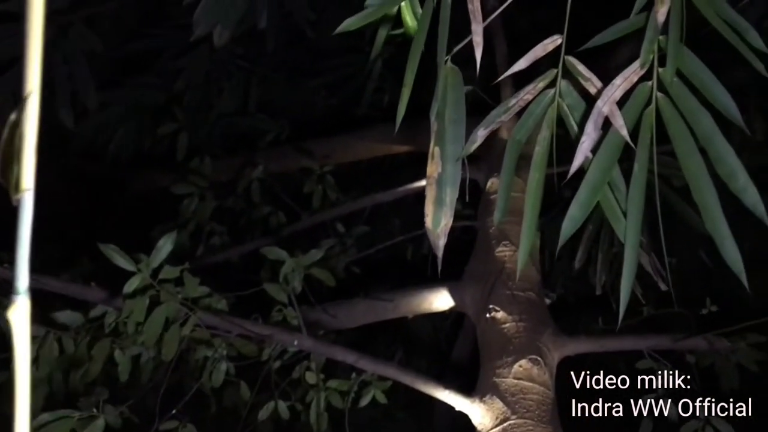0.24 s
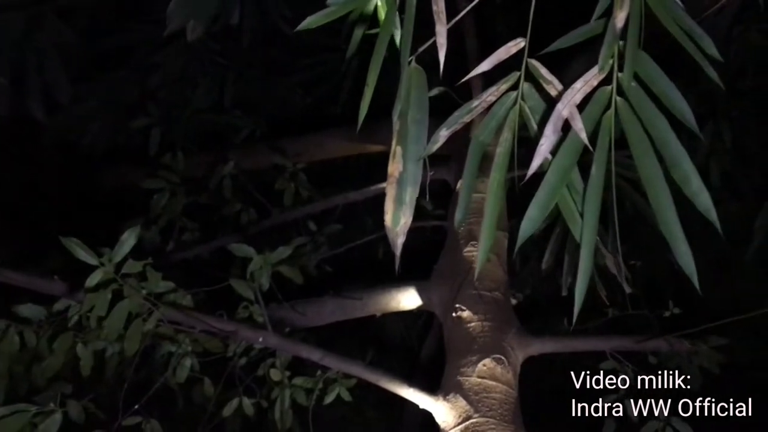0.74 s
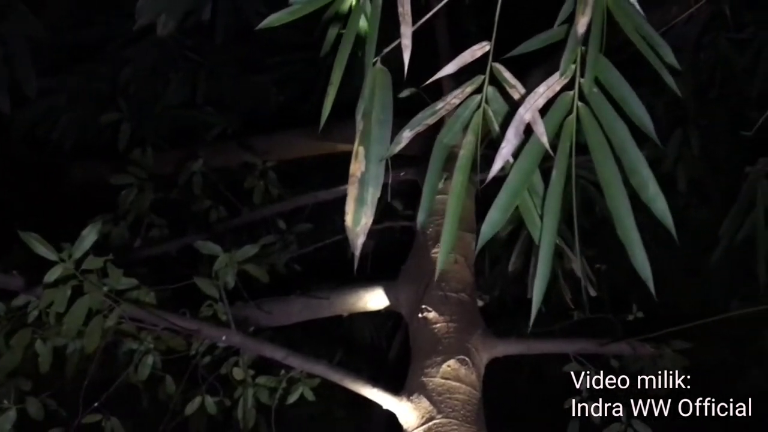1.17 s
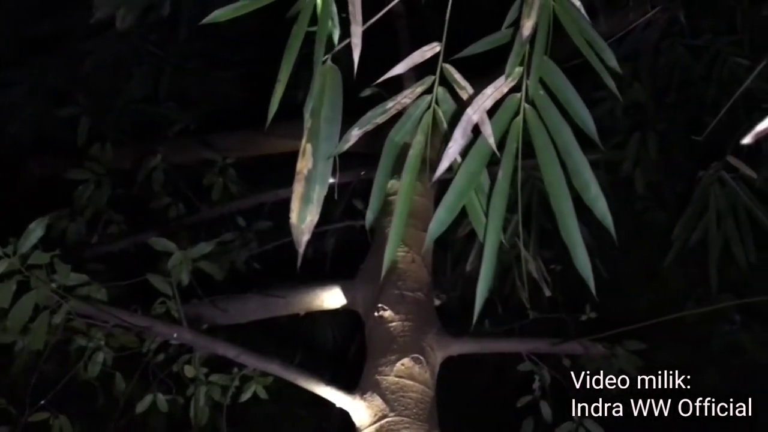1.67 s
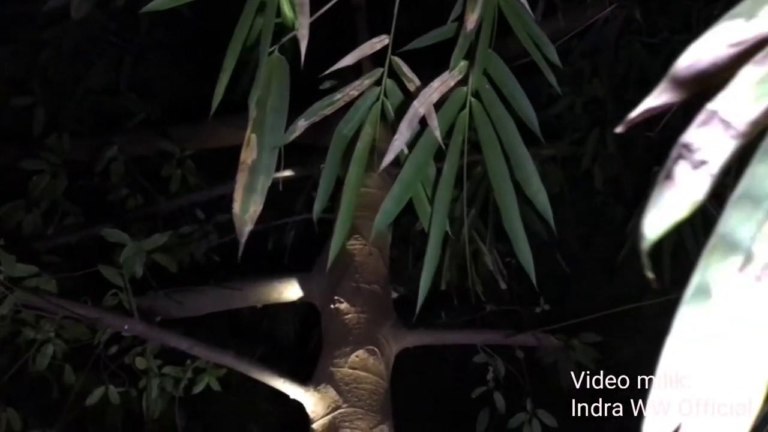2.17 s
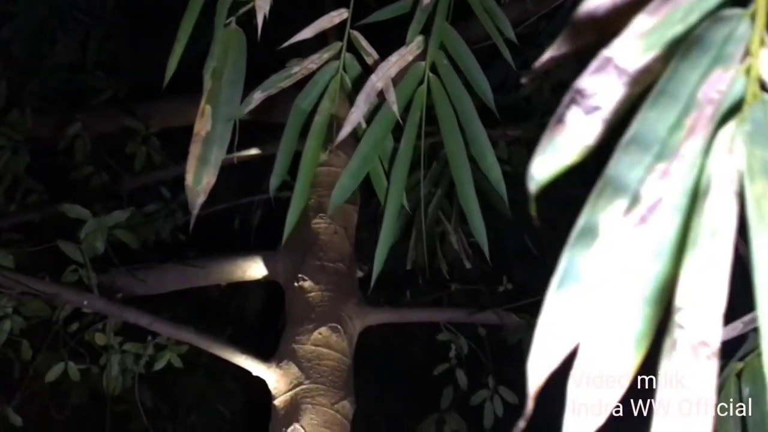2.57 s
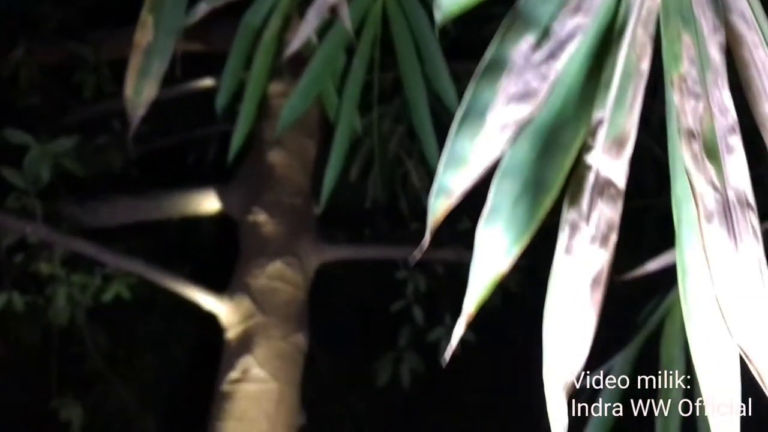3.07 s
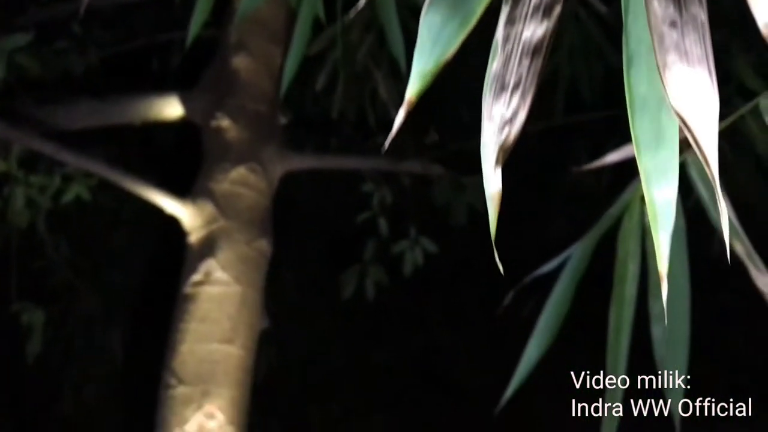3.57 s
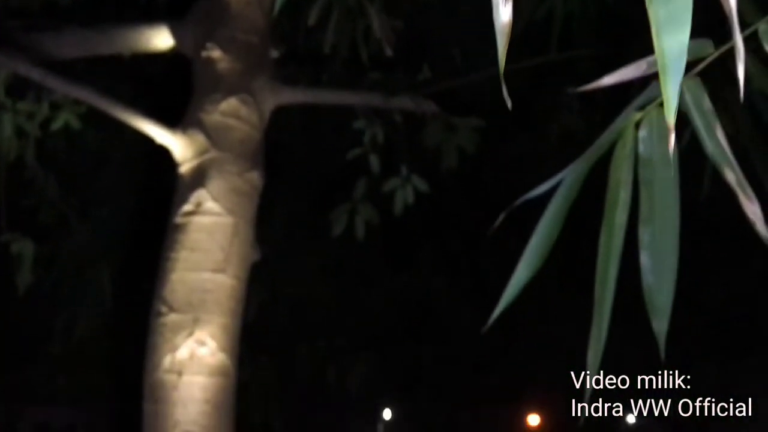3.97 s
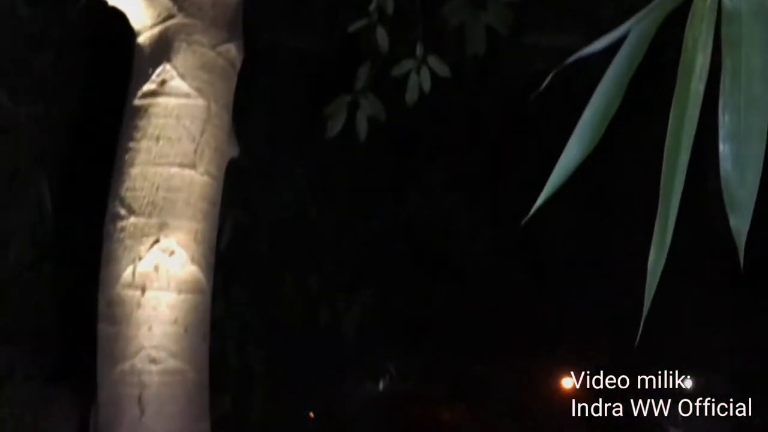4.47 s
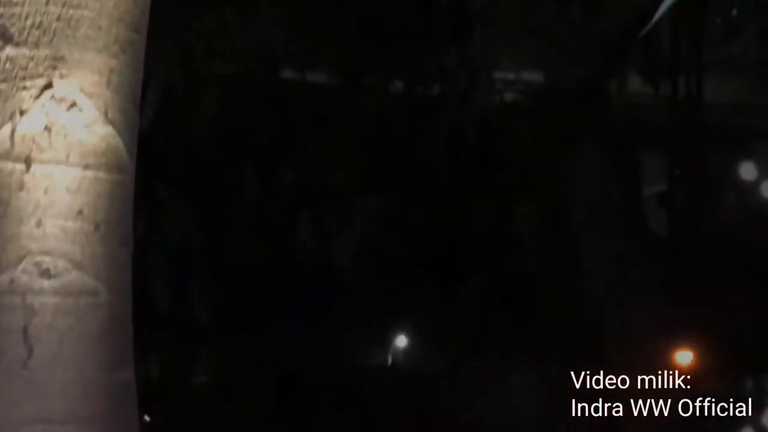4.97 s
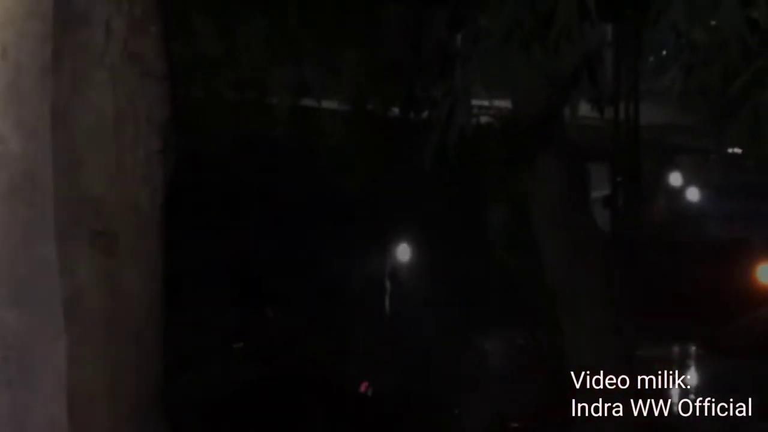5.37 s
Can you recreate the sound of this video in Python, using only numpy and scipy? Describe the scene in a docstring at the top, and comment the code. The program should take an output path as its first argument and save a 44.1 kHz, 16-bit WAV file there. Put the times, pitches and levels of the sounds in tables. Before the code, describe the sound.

Close frog croaks in spaced rasps over quiet night air and high cricket chirps, a far frog trills, and a strong rattling trill ends it.

```python
"""Among leaves at night, tree frogs call around a microphone.
A near frog gives four rasping croaks, pulses and air ringing its vocal sac, then trills four-pulse notes
with a shrill buzz on top; a far frog trills once, heard through its resonances. A cricket chirps in twos
and threes of humped tones. Filtered noise makes the night air, the hum of far insects, a low drone that
sets in, and wind rumbling on the microphone. A double tick strikes its case. Foliage scatters the calls."""
import sys
import numpy as np
from scipy import signal
from scipy.io import wavfile
from scipy.ndimage import uniform_filter1d

SR = 44100
rng = np.random.default_rng(int(sys.argv[2]) if len(sys.argv) > 2 else 0)


def dump(signal):
    """Clip the signal to [-1, 1] and save it as 16-bit WAV at the path in sys.argv[1]."""
    limited = np.clip(np.atleast_2d(signal).T, -1, 1)
    pcm = np.round(limited * 32767).astype(np.int16)
    wavfile.write(sys.argv[1], SR, pcm)


N = 248062


def amp(db):
    """Logarithmic level: decibels to amplitude gain."""
    return 10 ** (np.asarray(db) / 20)


def rms_one(x):
    """Normalisation: scales a signal to unit rms."""
    return x / np.sqrt(np.mean(x ** 2) + 1e-30)


def lowpass(x, cutoff_hz, order):
    """Butterworth low-pass: a maximally flat pass band."""
    return signal.sosfilt(signal.butter(order, cutoff_hz, fs=SR, output="sos"), x)


def band(x, low_hz, high_hz, order=2):
    """Butterworth band-pass: a maximally flat pass band."""
    return signal.sosfilt(signal.butter(order, [low_hz, high_hz], "band", fs=SR, output="sos"), x)


def pole_radius(width_hz):
    """Damping: the pole radius that gives four cascaded resonances this joint width."""
    return np.exp(-2.3 * np.pi * width_hz / SR)


def resonate(x, hz, width_hz):
    """Cascaded resonance: four equal stages give steep flanks, a soft attack and a peak gain near 1."""
    r = pole_radius(width_hz)
    zeros = [(1 - r * r) / 2, 0, (r * r - 1) / 2]
    poles = [1, -2 * r * np.cos(2 * np.pi * hz / SR), r * r]
    return signal.sosfilt([zeros + poles] * 4, x + 1e-18)


def gliding_resonance(x, hz, width_hz):
    """Heterodyning: shift a moving centre to zero, low-pass four times, shift back."""
    turn = np.exp(2j * np.pi * np.cumsum(hz) / SR)
    r = pole_radius(width_hz)
    return 2 * np.real(turn * signal.sosfilt([[1 - r, 0, 0, 1, -r, 0]] * 4, x / turn))


def resonate_all(x, modes):
    """Modal superposition: resonances side by side with alternating signs."""
    total = 0
    for k, (hz, width_hz, db) in enumerate(modes):
        total = total + (-1) ** k * amp(db) * resonate(x, hz, width_hz)
    return total


def add(out, s, burst):
    """Linear superposition: mixes in a burst centred on time s."""
    start = round(s * SR) - len(burst) // 2
    out[start:start + len(burst)] += burst[:N - start]


def tone_burst(hz, ms, sharpness):
    """Amplitude modulation: a sine under a hump that narrows as sharpness rises."""
    n = np.arange(round(ms * SR / 1000))
    hump = np.sin(np.pi * n / len(n)) ** sharpness
    return hump * np.sin(2 * np.pi * hz * n / SR)


# Spectrum of the night air [f/Hz, relative density level/dB]
NIGHT_SPECTRUM = [(56, -30), (95, -8.5), (113, -16.5), (223, -26), (259, -27), (582, -36), (1200, -40.5),
                  (1720, -52.5), (2370, -44), (3340, -53), (9800, -52.5), (11500, -58), (15500, -58)]
# Resonances of the far insects' hum [f/Hz, width/Hz, relative level/dB]
INSECT_HUM = [(2300, 50, -7.5), (2428, 43, -2), (2490, 25, -8)]
NIGHT_DB, HUM_DB = -72.5, -83   # rms levels


def night_air():
    """Band synthesis: half-octave noise bands follow a spectrum; resonated noise hums as far insects."""
    edges_hz = 90 * 2 ** np.arange(0, 7.6, .5)
    hz, db = np.transpose(NIGHT_SPECTRUM)
    white = rng.standard_normal((2, 2, N))   # neighbouring bands take independent noise
    air = 0
    for k, (low, high) in enumerate(zip(edges_hz, edges_hz[1:])):
        band_db = np.interp(np.log(low * high) / 2, np.log(hz), db)
        air = air + amp(band_db) * band(white[k % 2], low, high)
    mid, side = rms_one(air)
    hum = amp(HUM_DB) * rms_one(resonate_all(rng.standard_normal(N), INSECT_HUM))
    spread = mid + amp(-15) * side * [[1], [-1]]
    return amp(NIGHT_DB) * spread + hum


# Strength of the wind gusts [t/s, buffeting level/dB]
GUSTS = [(0.0, -53), (0.16, -42.5), (0.22, -71.5), (0.33, -45.5), (0.59, -65), (0.62, -46.5), (1.64, -62),
         (1.81, -45.5), (2.05, -70.5), (2.27, -22.5), (2.32, -39), (2.38, -34), (2.52, -61), (2.58, -45),
         (3.03, -58.5), (3.29, -33), (3.5, -65.5), (3.63, -33.5), (3.79, -47.5), (4.54, -65.5), (4.68, -32),
         (4.76, -57), (5.09, -65), (5.13, -48.5), (5.57, -46.5), (5.62, -48)]
RUMBLE_HZ = 75
# rumble level at a buffeting of -50 dB; share of the buffeting's swing; rms of its own waver
RUMBLE_DB, RUMBLE_FOLLOWS, RUMBLE_WAVER_DB = -58.5, 0.6, 2.5


def wind():
    """Turbulent pressure noise: gusts on the microphone ports buffet slowly and rumble above that."""
    white = rng.standard_normal((4, N))
    gust_db = np.interp(np.arange(N) / SR, *np.transpose(GUSTS))
    waver = rms_one(lowpass(rng.standard_normal(N), 3.0, order=2))
    rumble_db = RUMBLE_DB + RUMBLE_FOLLOWS * (gust_db + 50) + RUMBLE_WAVER_DB * waver
    buffet = amp(gust_db) * rms_one(band(white[:2], 10.5, 33, order=3))
    rumble = rms_one(band(white[2:], 45, 80)) + .7 * rms_one(resonate(white[2:], RUMBLE_HZ, 16))
    mid, side = buffet + amp(rumble_db) * rms_one(rumble)
    gusts = mid + amp(-31.0) * side * [[1], [-1]]
    return lowpass(gusts, 88, order=8)


# Cricket chirps [start t/s, main stroke level/dB, first stroke softer by/dB, stroke gap/ms, strokes]
CHIRPS = [(0.138, -59.5, 19, 37, 2), (0.3704, -43.5, 6, 36, 3), (0.611, -42, 5, 31.4, 3),
          (0.849, -44, 2.1, 36.5, 3), (1.0897, -43, 4.5, 30, 2), (1.3293, -49.5, 2.5, 34, 2),
          (1.5703, -46.5, 9.5, 31.4, 2), (3.5557, -45, 7.5, 36, 2), (3.7604, -44.5, 2.5, 39.2, 3),
          (4.0115, -42, 4, 36.7, 3), (4.2493, -43, 2, 35.3, 3), (4.4867, -45, 3.8, 34, 2),
          (4.7277, -43, 9.8, 37.5, 3)]
CRICKET_HZ, STROKE_MS = 4865, 15
THIRD_STROKE_GAPS, THIRD_STROKE_DB = 2.28, -2.5   # the third stroke comes late and a little softer


def cricket():
    """Stridulation: each wing stroke is a nearly pure tone that swells and stops, with a faint scrape."""
    out = np.zeros(N)
    for s, db, softer_db, gap_ms, strokes in CHIRPS:
        pattern = [(0, -softer_db), (1, 0), (THIRD_STROKE_GAPS, THIRD_STROKE_DB)]
        for gaps, change_db in pattern[:round(strokes)]:
            pitch_hz = CRICKET_HZ * (1 + 0.0068 * rng.standard_normal())
            stroke = tone_burst(pitch_hz, STROKE_MS, sharpness=2.2)
            scrape = tone_burst(rng.uniform(4600, 5400), STROKE_MS, sharpness=40)
            centre_s = s + 0.0026 + gaps * gap_ms / 1000
            add(out, centre_s, amp(db + change_db) * (stroke + amp(-18.5) * scrape))
    return out


# Croak envelopes [start t/s, level after attack/dB, middle breakpoint t/s, middle breakpoint level/dB, release
# t/s, # release level/dB, fade/(dB/s), end t/s, spectral tilt at start/(dB/octave), tilt at end/(dB/octave)]
CROAK_ENVELOPES = [(0.172, -32.5, 0.264, -19.5, 0.28, -32.5, 420, 0.37, -14, 7.5),
                   (1.182, -31, 1.341, -30, 1.391, -32, 200, 1.52, -16.5, 19.5),
                   (2.288, -27.5, 2.404, -18, 2.441, -19.5, 290, 2.55, -10.5, 11.5),
                   (4.422, -35, 3.8, -37.5, 4.66, -30, 260, 4.7, -21.5, 18)]
# Vocal sac resonances, one list a croak [f/Hz, width/Hz, relative level/dB]
CROAK_SACS = [
    [(552.6, 47, -17), (1093, 87, -23), (1204, 120, -24), (1394, 350, -18.5), (1840, 220, -10.5),
     (2004, 60, 1), (2692, 150, -23), (3020, 80, -23.5), (3290, 80, -40.5), (3820, 70, -46.5)],
    [(672.6, 42, -15), (1402, 89, 0.5), (1971, 35, 0), (2046, 167, 0.5), (2618, 77, -3.5), (2815, 83, -2),
     (3220, 200, -21.5), (4100, 120, -34.5), (4640, 140, -46)],
    [(578.3, 58, -7), (1050, 350, -18), (1577, 270, -12), (1977, 118, -0.5), (2122, 180, 1),
     (2820, 293, -15.5), (3320, 66, -26), (3770, 94, -39), (4223, 190, -40.5), (5440, 60, -40.5),
     (5890, 69, -37), (7520, 86, -49)],
    [(621, 60, -16.5), (1228, 142, -4), (1545, 86, 0), (1775, 170, 1), (2030, 51, 15), (2278, 110, 8.5),
     (2593, 216, 1.5), (3080, 38, -15), (4000, 50, -45), (4450, 100, -42.5), (6000, 130, -49)],
]
# Croak pulsing [pulses/(1/s), unevenness (0-1), first upper edge f/Hz, edge rise/(octave/s),
# resonance glide/(octave/s, less above 2000 Hz), bass level at first/dB]
CROAK_PULSING = [(125, .3, 1150, 14, .01, -1), (165, .1, 1450, 14, -.45, -8), (120, .25, 1450, 10, .25, -6),
                 (200, .3, 1420, 9, .4, -45)]
CROAK_ATTACK_S, CROAK_RISE_DB = 0.038, 32
SAC_EDGE_HZ = 2800   # resonances above it darken and brighten no further


def croak(row, sac, per_s, uneven, edge_hz, opening, glide, bass_db):
    """Source and filter: uneven vocal pulses and rushing air ring each sac resonance differently."""
    begin, knee_db, middle_s, middle_db, release_s, release_db, fade, end, dark, bright = row
    start, stop = round(begin * SR), round(end * SR)
    t = np.arange(stop - start) / SR
    times = [begin, begin + CROAK_ATTACK_S, middle_s, release_s, end]
    end_db = release_db - fade * (end - release_s)
    level_db = np.interp(begin + t, times, [knee_db - CROAK_RISE_DB, knee_db, middle_db, release_db, end_db])

    gaps = SR / per_s * np.exp(uneven * rng.standard_normal(120))
    at = np.cumsum(gaps).astype(int)
    at = at[at < stop - start]
    tilt = dark + (bright - dark) * t / t[-1]   # the sac brightens as it fills
    voice = 0
    for hz, width_hz, db in sac:
        drive = (0.07 + .2 * (hz > SAC_EDGE_HZ)) * rng.standard_normal(stop - start)   # rushing air
        drive[at] += (1 + 0.37 * uneven * rng.standard_normal(120))[:len(at)]   # vocal pulses
        glide_octaves = min(1, 2000 / hz) * glide * (t - t.mean())
        ringing = rms_one(gliding_resonance(drive, hz * 2 ** glide_octaves, width_hz))
        # the slack sac radiates little above an edge that climbs as it fills
        tilt_hz = min(hz, SAC_EDGE_HZ)
        above_edge = np.log2(tilt_hz / edge_hz) - opening * t
        muffled_db = 50 * np.clip(above_edge, 0, .4 + .4 * np.exp(-t / .05))
        held_back_db = bass_db * np.exp(-t / .04) * (hz < .9 * edge_hz)
        mode_db = db + 10 * np.log10(width_hz) + tilt * np.log2(tilt_hz / 2000) - muffled_db
        voice = voice + ringing * amp(held_back_db) * amp(mode_db)

    running_rms = np.sqrt(uniform_filter1d(voice ** 2, size=1500) + 1e-12)
    pressure = amp(uniform_filter1d(level_db, size=450))   # lung pressure alone sets the level
    out = np.zeros(N)
    out[start:stop] = voice / running_rms * pressure * signal.windows.tukey(len(t), .1)
    return band(out, 540, 9000, order=4)


def leaves(x, t60, spread_db):
    """Diffuse scattering: foliage answers with a decaying noise tail, nearly alike left and right."""
    t = np.arange(SR // 2) / SR
    onset = np.clip(t / 0.0013 - 1, 0, 1)   # the tail starts after 1.3 ms
    mid, side = rng.standard_normal((2, len(t))) * amp(-60 * t / t60) * onset
    tails = (mid + amp(spread_db) * side * [[1], [-1]]) / np.sqrt(np.sum(mid ** 2))
    return signal.fftconvolve(x[None], tails, axes=1)[:, :N]


# Far trill notes [t/s, relative level/dB, centre of the upper band f/Hz]
FAR_NOTES = [(1.482, -42.5, 2840), (1.543, -45.5, 2445), (1.624, -45.5, 2410), (1.695, -44.5, 2670),
             (1.761, -41.5, 2390), (1.8367, -42.5, 2520), (1.9128, -39.5, 2310), (1.9888, -38.5, 2893),
             (2.0638, -41, 2620), (2.143, -38, 2365), (2.2236, -39.5, 2346)]
# Resonances of the far frog's sac [f/Hz, width/Hz, relative level/dB]
FAR_RESONANCES = [(1926, 61, 7), (2110, 120, 0), (2500, 38, -12.5), (2620, 230, 8), (2820, 120, -9),
                  (2705, 40, -12)]
# Nominal delay of each pulse within a trill note [t/ms]
PULSE_DELAYS_MS = [0, 8.85, 17.75, 27.0]
# Accent of each far pulse; distance softens the start of each note [level/dB]
FAR_ACCENTS = [0.5, 3.5, 0.8, -1]
FAR_UPPER_DB = -5   # resonances above 2350 Hz, at the note's centre


def far_trill():
    """Modal excitation: four-pulse notes kick every resonance, each wavering on its own; the upper ones are
    emphasised around each note's centre."""
    out = 0
    for hz, width_hz, level_db in FAR_RESONANCES:
        kicks = np.zeros(N)
        for s, db, centre_hz in FAR_NOTES:
            # the upper band's emphasis wanders note by note
            upper_db = (FAR_UPPER_DB - 500 * np.log2(hz / centre_hz) ** 2) * (hz > 2350)
            for after_ms, accent_db in zip(PULSE_DELAYS_MS, FAR_ACCENTS):
                strength_db = db + accent_db + upper_db + 3.07 * rng.standard_normal()
                add(kicks, s + (0.91 * after_ms - 2.5) / 1000, amp([strength_db]))
        out = out + amp(level_db) * resonate(kicks, hz, width_hz)
    return amp(36.5) * out


DRONE_FROM_S, DRONE_HZ, DRONE_DB = 3.08, 78.8, -61.5


def drone():
    """Narrow-band noise: a low drone sets in within a tenth of a second and stays."""
    rise = np.clip((np.arange(N) / SR - DRONE_FROM_S) / 0.09, 0, 1)
    return amp(DRONE_DB) * rise * rms_one(resonate(rng.standard_normal(N), DRONE_HZ, 9.0))


# Near trill notes [t/s, pitch f/Hz, first pulse level before accent/dB, change per pulse/dB,
# centre of the shrill buzz f/Hz]
TRILL_NOTES = [(4.712, 1840, -18.5, -4.5, 6400), (4.7544, 1977, -11, -2.25, 6600),
               (4.8198, 2157, -12, -2.5, 5950), (4.8954, 2035, -9, -2.4, 5730),
               (4.968, 2140, -9, -2.5, 6100), (5.0527, 2010, -10, -0.84, 6580),
               (5.125, 2100, -8, -1.53, 5800), (5.2074, 2050, -10, -1.1, 6500),
               (5.287, 2067, -9, -1.24, 6400), (5.3635, 2140, -7.5, -2, 6100),
               (5.4398, 2106, -8, -1.77, 6140), (5.5139, 2184, -7.5, -1.84, 6250),
               (5.5906, 2056, -8.5, -1.4, 6200)]
# Resonances of the near frog's sac in the trill [f/Hz, width/Hz, relative level/dB]
TRILL_RESONANCES = [(569, 33, -25.5), (636, 164, -28.5), (1117, 138, -20.5), (1413, 277, -13.5),
                    (2560, 348, -14.5), (3400, 61, -31.5), (3950, 120, -44.5), (4256, 150, -41.5)]
# Soft low pulse before the trill [t/s, f/Hz, level/dB]
LEAD_IN_PULSE = (4.7, 1600, -22.5)
# Accent of each near pulse [level/dB]
PULSE_ACCENTS = [-4.2, 1, 1, -0.72]
PULSE_MS, PULSE_SPREAD_DB = 3.636, 1.84
TRILL_AIR_DB, TRILL_AIR_MS = -32.5, 20.4   # air rushing after each pulse rings the sac too


def near_trill():
    """Driven resonance: short humped bursts at the note's pitch; strong pulses ring the sac harder."""
    bursts, kicks = np.zeros(N), np.zeros(N)
    lead_s, lead_hz, lead_db = LEAD_IN_PULSE
    add(bursts, lead_s, amp(lead_db) * tone_burst(lead_hz, 5.1, sharpness=1.7))
    for s, hz, first_db, change_db, _ in TRILL_NOTES:
        for k, (after_ms, accent_db) in enumerate(zip(PULSE_DELAYS_MS, PULSE_ACCENTS)):
            db = first_db + k * change_db + accent_db + PULSE_SPREAD_DB * rng.standard_normal()
            pitch_hz = hz * (1 + .02 * rng.standard_normal())
            add(bursts, s + after_ms / 1000, amp(db) * tone_burst(pitch_hz, PULSE_MS, sharpness=0.94))
            kick_db = 1.3 * db + 2.35 * rng.standard_normal()
            add(kicks, s + (after_ms - 1.6) / 1000, amp([kick_db]))
    r = np.exp(-1000 / (TRILL_AIR_MS * SR))
    air = signal.lfilter([1], [1, -r], kicks) * rng.standard_normal(N)
    sac = resonate_all(kicks + amp(TRILL_AIR_DB) * air, TRILL_RESONANCES)
    return band(bursts, 1300, 3100, order=3) + amp(37.0) * sac


# Moving bands of the shrill buzz [f/Hz, width/Hz, relative level/dB]
BUZZ_BANDS = [(5926, 140, -52), (6230, 76, -55.5), (6567, 130, -57.5)]
# Lower band, its emphasis the same for all notes [f/Hz, width/Hz, relative level/dB]
BUZZ_LOW = (5230, 130, -64.5)
BUZZ_FOCUS_DB = 905.5   # loss per squared octave off the note's centre


def shrill(trill):
    """Modulated noise: bands near three times the trill's pitch throb and shift emphasis with its notes."""
    power = trill ** 2
    throb = (uniform_filter1d(power, size=1500) / np.max(power) + 0.00053) ** 0.3
    notes = np.array(TRILL_NOTES)
    now = np.searchsorted(notes[:, 0], np.arange(N) / SR + .01) - 1
    centre_hz = uniform_filter1d(notes[np.maximum(now, 0), -1], size=600)
    low_hz, low_width_hz, low_db = BUZZ_LOW
    low = rms_one(resonate(rng.standard_normal(N), low_hz, low_width_hz))
    buzz = amp(low_db) * (throb / throb.max()) ** 1.4 * low
    for hz, width_hz, db in BUZZ_BANDS:
        focused_db = db - BUZZ_FOCUS_DB * np.log2(hz / centre_hz) ** 2
        buzz = buzz + amp(focused_db) * rms_one(resonate(rng.standard_normal(N), hz, width_hz))
    gate = uniform_filter1d((now > 0) * 1., size=900)   # opens at the second note
    return 3.0 * throb * buzz * gate


# Ticks on the case [t/s, peak level/dB]
TICKS = [(5.3088, -5), (5.323, -24)]


def taps():
    """Impulse excitation: fingertip-like ticks, each a quick inward push, then a bright rattle."""
    out = np.zeros(N)
    for s, db in TICKS:
        add(out, s, -amp(db) * np.hanning(round(0.00027 * SR)))
        decay = np.exp(-np.arange(120) / 22)   # in samples
        rattle = rms_one(band(rng.standard_normal(120), 5000, 16000)) * decay
        add(out, s + 0.00076, amp(db - 18.5) * rattle)
    return out


LEAVES_T60_S, LEAVES_SCATTER_DB = 0.23, -8.5   # croaks
FAR_T60_S, FAR_SCATTER_DB, FAR_DIRECT_DB = .3, -5.5, -7.5
NEAR_T60_S, NEAR_SCATTER_DB = .27, -6.3
GRASS_T60_S, GRASS_SCATTER_DB = 0.18, -6   # cricket


def scene():
    """Superposition: callers, their scatter in the leaves, and the sounds at the microphone."""
    croaks = sum(croak(row, sac, *pulsing)
                 for row, sac, pulsing in zip(CROAK_ENVELOPES, CROAK_SACS, CROAK_PULSING))
    trill, far, chirps = near_trill(), far_trill(), cricket()
    scattered = leaves(amp(LEAVES_SCATTER_DB) * croaks, LEAVES_T60_S, spread_db=-48.5)
    scattered += amp(FAR_SCATTER_DB) * leaves(far, FAR_T60_S, spread_db=-38.5)
    scattered += amp(NEAR_SCATTER_DB) * leaves(trill, NEAR_T60_S, spread_db=-66)
    scattered += amp(GRASS_SCATTER_DB) * leaves(chirps, GRASS_T60_S, spread_db=-28)
    direct = croaks + trill + amp(FAR_DIRECT_DB) * far + chirps + shrill(trill)
    return direct + scattered + night_air() + wind() + drone() + taps()


CUTOFF_HZ = 15950


def record(dry):
    """Envelope following: a thin high hiss tracks the calls' loudness; an elliptic low-pass cuts the top."""
    power = band(dry[0], 1000, 3500) ** 2
    by_pulse = uniform_filter1d(power, size=130)
    by_note = uniform_filter1d(power, size=1300)
    loudness = np.sqrt(0.11 * by_pulse + 0.071 * by_note + 1e-20)
    mid, side = band(rng.standard_normal((2, N)), 9600, 18000, order=12)
    spread = mid + amp(-2) * side * [[1], [-1]]
    hiss = amp(-17.5) * loudness ** 1.44 * spread
    return signal.sosfilt(signal.ellip(12, .5, 70, CUTOFF_HZ, fs=SR, output="sos"), dry + hiss)


dry = scene()
out = record(dry)
dump(out)
```